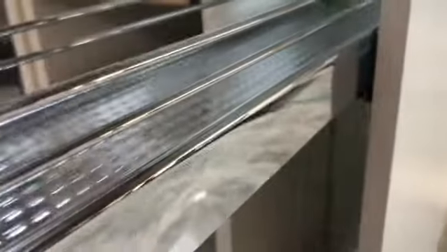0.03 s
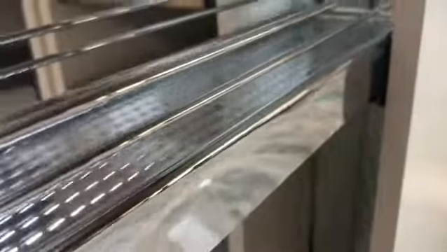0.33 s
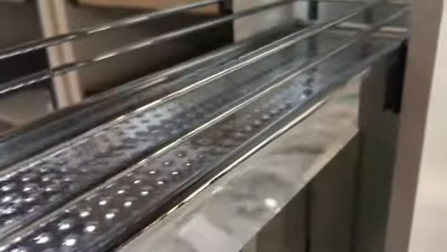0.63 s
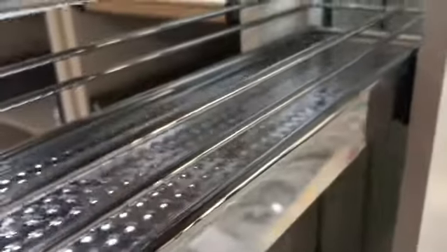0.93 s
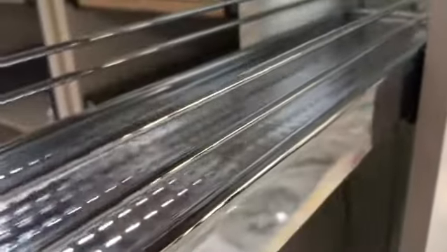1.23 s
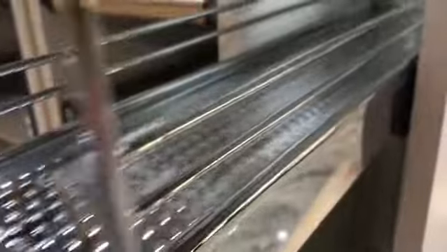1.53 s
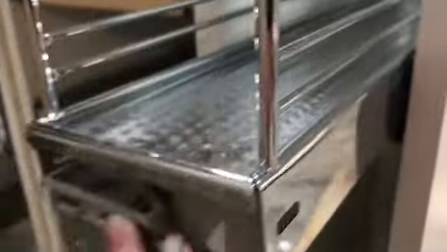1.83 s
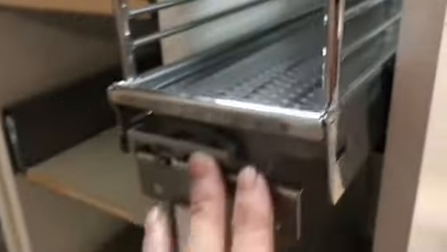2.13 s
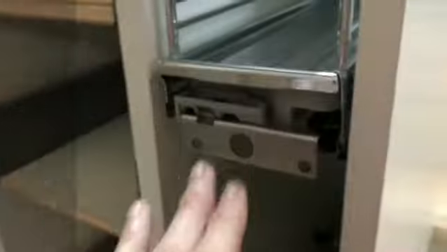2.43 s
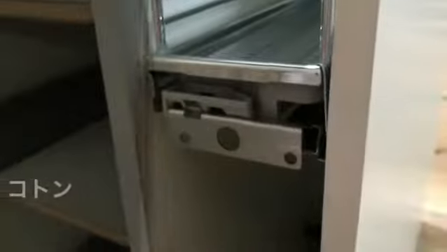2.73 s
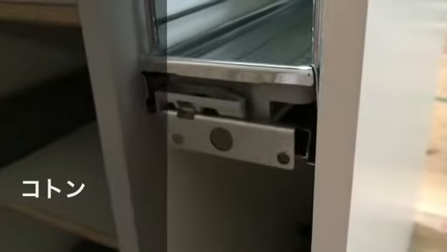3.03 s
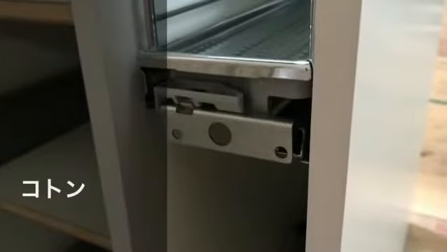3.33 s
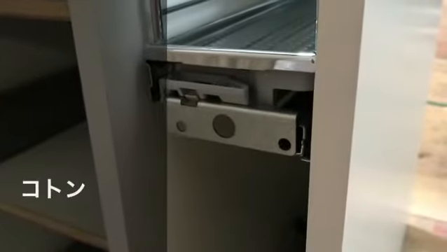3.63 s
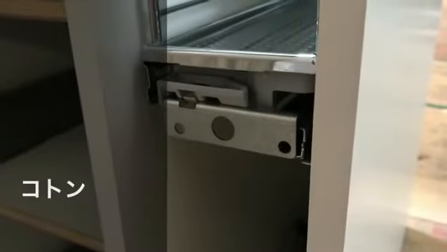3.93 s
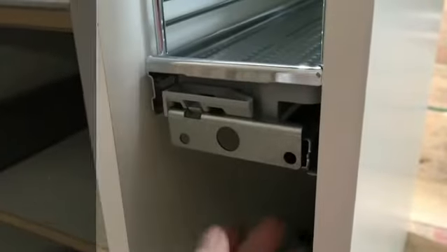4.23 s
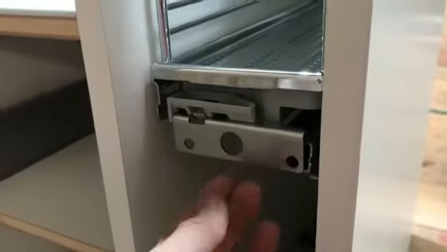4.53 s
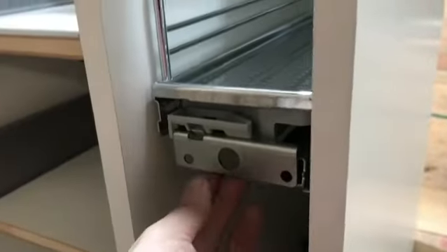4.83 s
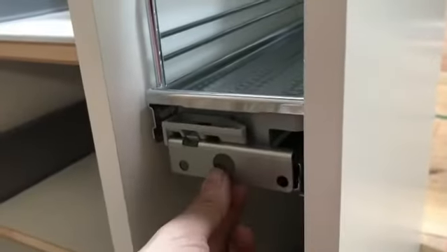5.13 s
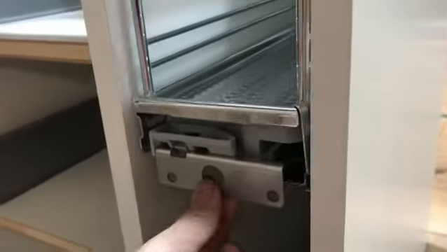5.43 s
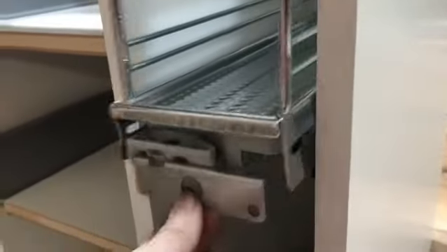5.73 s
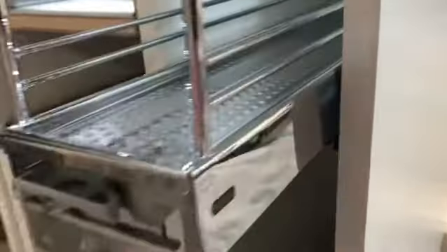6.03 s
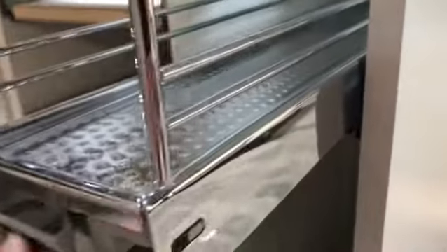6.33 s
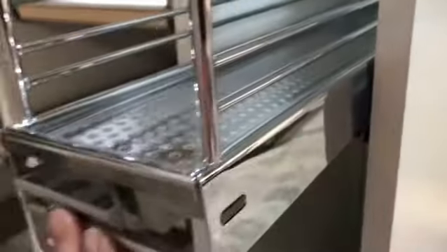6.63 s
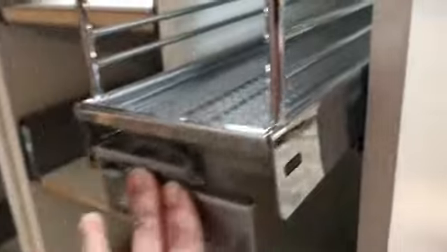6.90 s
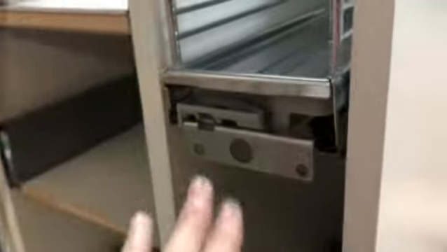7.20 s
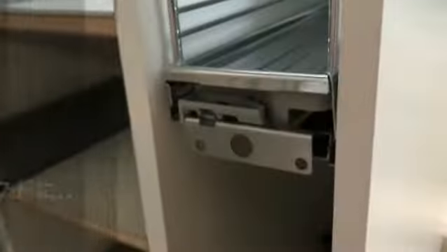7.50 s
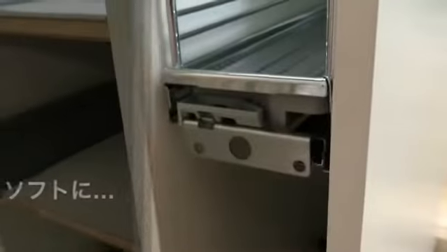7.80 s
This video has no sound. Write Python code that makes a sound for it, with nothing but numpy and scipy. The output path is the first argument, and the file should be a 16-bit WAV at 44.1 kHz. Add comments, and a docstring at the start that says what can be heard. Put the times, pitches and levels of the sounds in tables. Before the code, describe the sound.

In a quiet kitchen, a metal basket twice rolls out and back, clunking into a soft-close catch followed by a faint low hum.

```python
"""A steel pull-out basket in a kitchen cabinet, twice drawn out and pushed shut, close to one microphone.
Its ball-bearing rails rumble through the cabinet, knock as they extend and rattle at the end stop.
Each push ends in a clunk at the soft-close catch, and a damper draws the basket in with a low hum.
After the first push the catch clicks home and fingers knock the front plate.
The room is small and quiet."""
import sys
import numpy as np
from scipy import signal
from scipy.fft import rfft, irfft, next_fast_len
from scipy.io import wavfile
from scipy.ndimage import uniform_filter1d

SR = 44100
rng = np.random.default_rng(int(sys.argv[2]) if len(sys.argv) > 2 else 0)


def waveform_to_disk(signal):
    """Save audio, clipped to [-1, 1], as 16-bit WAV at the path in sys.argv[1]."""
    frames = np.transpose(np.atleast_2d(signal))
    scaled = np.clip(frames, -1, 1) * 32767
    samples = np.round(scaled).astype(np.int16)
    wavfile.write(sys.argv[1], SR, samples)


N = 355446
TIME = np.arange(N) / SR

# modes of the steel frame and of the loaded cabinet: pitch_hz, level_db, t60_s
STEEL_MODES = [(798, -9.5, 0.088), (894, -13, 0.097), (979, -18, 0.076), (1103, -11, 0.076),
               (1370, -18, 0.14), (1514, -7.5, .05), (1583, 0.5, 0.05), (1796, -6.5, 0.038),
               (1970, 0, 0.062), (2067, -6, 0.07), (2375, -2, 0.0503), (2364, 0, 0.038), (2660, -8, 0.09),
               (2780, -4, 0.059), (3180, -12, 0.043), (3240, -9, 0.054), (3404, -3, 0.05),
               (3507, -1.5, .06), (3880, -4.5, 0.038), (4115, 3.5, 0.043), (4220, -11, 0.044),
               (4840, -9, 0.041), (4730, -11, 0.018), (5100, -21.5, .035), (5600, -17, 0.058),
               (6560, -3, 0.029), (8300, -18.5, 0.044), (11400, -17, 0.032), (11300, -21.5, .035)]
CABINET_MODES = [(74.87, -11.5, 1.1), (100.2, -8, 0.37), (128.1, 0, 0.55), (140.3, -7.5, 0.43),
                 (180.7, -3.5, .55), (193.8, -4.5, 0.38), (216.8, -9, 0.21), (265, -8, 0.25),
                 (306.4, -7.5, 0.28), (345, -22.5, 0.17), (407, -7.5, .3), (430, -6, 0.21),
                 (486, -10.5, 0.91), (516, -5.5, 0.23), (623, -16.5, 0.252), (750, -11, .2)]
# the basket meets the catch and a low hum follows: start_s, metal_db, thump_db, hum_length_s
CLUNKS = [(2.3855, -25.5, -38.5, 0.68), (7.2329, -26, -41.5, 0.684)]
# spectrum of the steel in a clunk: frequency_hz, level_db
CLUNK_SPECTRUM = [(150, -13.5), (450, -11.5), (850, -7), (1250, -15), (1700, -1.5), (2500, -2),
                  (4300, -5.5), (5200, -14), (7000, -11), (9500, -20.5), (12000, -21.5), (16000, -30)]


def amp(db):
    """Decibels to gain."""
    return 10 ** (np.asarray(db) / 20)


def unit(x):
    """Scales to rms 1."""
    return x / np.sqrt(np.mean(x ** 2) + 1e-30)


def read(points, hz):
    """Reads a table on a log-frequency axis."""
    points_hz, values = np.transpose(points)
    return np.interp(np.log(hz + 1), np.log(points_hz + 1), values)


def pitches(modes):
    """The modes' frequencies in Hz."""
    return np.array(modes)[:, 0]


def add(mix, start_s, sound):
    """Mixes a sound in at start_s."""
    part = mix[max(round(start_s * SR), 0):][:len(sound)]
    part += sound[:len(part)]


def colour(x, spectrum):
    """Filters by a table of frequency_hz, level_db."""
    size = next_fast_len(len(x))
    gain = amp(read(spectrum, np.fft.rfftfreq(size, 1 / SR)))
    return irfft(rfft(x, size) * gain, size)[:len(x)]


def decay(t, t60):
    """Free decay, 60 dB down after t60 seconds."""
    return np.exp(-np.log(1000) * t / np.maximum(t60, 1e-3))


def dense_modes(db_at, t60, size):
    """Countless close modes of random phase, dying together."""
    hz = np.fft.rfftfreq(size, 1 / SR)
    fade = decay(TIME[:size], t60)
    modes = irfft(amp(db_at(hz)) * np.exp(2j * np.pi * rng.random(len(hz))), size)
    return unit(modes * fade) * np.sqrt(np.mean(fade ** 2))


def ringing(modes, size, swell_cycles=0.092):
    """One row a mode: a sine that builds up and dies, neighbours in opposite sign."""
    t = TIME[:size]
    rows = []
    for k, (hz, db, t60) in enumerate(modes):
        swell = 1 - np.exp(-t * hz / swell_cycles)
        rows.append((-1) ** k * amp(db) * decay(t, t60) * swell * np.sin(2 * np.pi * hz * t))
    return np.array(rows)


def grains(per_s, spread_db):
    """Balls strike specks on the track: random clicks of uneven size."""
    at = np.flatnonzero(rng.random(N) < per_s / SR)
    sign = np.sign(rng.random(N)[at] - .5)
    out = np.zeros(N)
    out[at] = sign * amp(spread_db * np.minimum(rng.exponential(1, N)[at], 4))
    return unit(out)


def rolling(steel, wood, rumble_db=-2, ring_db=-7, frame_db=-17.5, fade_s=0.15):
    """The bearings shake the cabinet, which rings on; the balls themselves grind and hiss."""
    # levels along each stroke: time_s, shake_db, grind_db, hiss_db
    first_pull = [(0, -50, -60, -70), (.15, -51.5, -60.5, -68), (.52, -51, -63.5, -69), (.6, -53, -56, -64),
                  (.83, -61.5, -74, -85), (.93, -54, -72, -99), (.98, -65, -84, -91)]
    first_push = [(1.02, -69, -83.5, -87), (1.12, -54, -67.5, -73.5), (1.35, -50.5, -58.5, -66.5),
                  (1.72, -48.5, -63.5, -71.5), (2.0, -50.5, -66.5, -75.5), (2.22, -45.5, -62, -73.5),
                  (2.34, -41.5, -57.5, -65)]
    second_pull = [(5.14, -58.5, -85, -86), (5.24, -61, -68.5, -69.5), (5.62, -54, -69.5, -70.5),
                   (5.74, -60.5, -71, -67.5), (5.81, -45, -56, -69), (6.04, -42, -60, -69),
                   (6.25, -57, -66, -75.5), (6.33, -56, -59.5, -71), (6.469, -64, -77, -78)]
    second_push = [(6.64, -58.5, -84, -94), (6.87, -54, -69.5, -78.5), (7.02, -46, -59, -72),
                   (7.13, -44, -60, -72), (7.19, -52.5, -56.5, -64)]
    # spectra of the cabinet's rumble, the balls and the track: frequency_hz, level_db
    rumble_spectrum = [(25, -34.5), (45, -19), (60, -6), (72, 3.5), (90, -0.5), (110, -2.5), (130, 6),
                       (160, -7), (190, -3), (225, -4.5), (300, -13), (450, -23), (900, -59)]
    ball_spectrum = [(150, -20), (300, -1.5), (450, 3), (600, -3), (850, -4), (1200, -12.5), (1700, -15),
                     (3000, -36.5)]
    track_spectrum = [(760, -30.5), (1300, -4), (1840, -2.5), (2770, 1), (3110, -4.5), (4040, -4),
                      (4990, -10), (5960, -5.5), (7590, -14), (8980, -10.5), (10500, -16.5), (14400, -14),
                      (16000, -13.5)]
    shake, grind, hiss = np.zeros((3, N))
    for stroke in (first_pull, first_push, second_pull, second_push):
        times, *levels_db = np.transpose(stroke)
        outside_s = np.abs(TIME - np.clip(TIME, times[0], times[-1]))
        for envelope, db in zip((shake, grind, hiss), levels_db):
            envelope += amp(np.interp(TIME, times, db)) * np.exp(-outside_s / fade_s)
    rumble = unit(colour(grains(per_s=1500, spread_db=1.5), rumble_spectrum))
    response = amp(read(rumble_spectrum, pitches(CABINET_MODES)) / 2) @ wood
    jolts = shake * grains(per_s=1500, spread_db=1.5)
    ring = signal.oaconvolve(jolts, response / np.linalg.norm(response))[:N]
    balls = unit(colour(grains(per_s=3000, spread_db=2.2), ball_spectrum))
    specks = grains(per_s=9000, spread_db=1.5)
    frame = amp(frame_db) * unit(signal.oaconvolve(specks, steel.sum(0))[:N])
    track = unit(colour(specks + frame, track_spectrum))
    return amp(rumble_db) * shake * rumble + amp(ring_db) * ring + grind * balls + hiss * track


def rubbing(drone_from_hz=141, drone_to_hz=129.25, drone_width_hz=35):
    """Friction noise in gliding resonances that swell and fade."""
    # the rails drone in mid-stroke: start_s, peak_s, end_s, level_db
    drones = [(.3, .492, 0.95, -54.5), (1.1, 1.65, 1.97, -50.5), (5.3, 5.57, 5.78, -50.5)]
    # slides and damper whirr faintly: start_s, peak_s, end_s, level_db, from_hz, to_hz, width_hz
    rubs = [(.648, .78, 1.23, -72, 1724, 1394, 640), (3, 3.386, 4.4, -76, 697, 1601, 3600),
            (3.715, 3.775, 4.0, -62, 2106, 1398, 3730), (5.151, 5.374, 5.8, -70.5, 3360, 3170, 2000),
            (6.381, 6.465, 6.52, -69, 7970, 12500, 9150), (7.353, 7.455, 8.3, -74.5, 1211, 1016, 380)]
    glides = [(*row, drone_from_hz, drone_to_hz, drone_width_hz) for row in drones] + rubs
    out = np.zeros(N)
    for start, peak, end, db, from_hz, to_hz, width_hz in glides:
        t = np.arange(start, end, 1 / SR)[:SR]
        pole = np.exp(-np.pi * width_hz / SR)
        noise = rng.standard_normal(SR) + 1j * rng.standard_normal(SR)
        narrow = signal.lfilter([1], [1, -2 * pole, pole * pole], noise)[:len(t)]
        carrier = np.exp(2j * np.pi * np.cumsum(np.linspace(from_hz, to_hz, len(t))) / SR)
        swell = np.interp(t, [start, peak, end], [0, 1, 0])
        add(out, start, amp(db) * swell * unit((narrow * carrier).real))
    return out


def band(centre_hz, octaves):
    """The band that a contact excites, as dB against frequency."""
    return lambda hz: -4.5 * (np.log2((hz + 1) / centre_hz) / octaves) ** 2


def thump(wood, cut_hz, t60, rise_s, ring_db):
    """A blow spreads into the cabinet; a soft blow reaches only its low modes."""
    # the wood panels' dense modes: frequency_hz, level_db
    panels = [(20, -47.5), (35, -30), (65, -4), (130, -1.5), (250, 0.5), (350, -8), (520, -6), (900, -10.5),
              (2000, -14), (5000, -62)]
    softness_db = lambda hz: -10 * np.log10(1 + (hz / cut_hz) ** 4)
    out = amp(ring_db) * (amp(softness_db(pitches(CABINET_MODES))) @ wood)
    add(out, 0, dense_modes(lambda hz: read(panels, hz) + softness_db(hz), t60, size=16384))
    return out * (1 - np.exp(-TIME[:len(out)] / rise_s))


def clink(steel, reach, t60, ring_db=-14, rise_s=0.0006):
    """A steel contact: a dense crack, and the frame's modes as far as the contact reaches them."""
    ring = amp(ring_db) * (amp(reach(pitches(STEEL_MODES))) @ steel)
    crack = dense_modes(reach, t60, size=len(ring))
    return (crack + ring) * (1 - np.exp(-TIME[:len(ring)] / rise_s))


def knock(steel, wood, metal_db, reach, t60, thump_db, cut_hz):
    """A small contact excites its own band of the steel and shakes the cabinet."""
    out = amp(thump_db) * thump(wood, cut_hz, t60=0.18, rise_s=0.003, ring_db=-6.5)
    add(out, 0, amp(metal_db) * clink(steel, reach, t60))
    return out


def loose(modes, depth=0.43, size=16384):
    """A loose part touches its neighbours, so each of its modes flutters."""
    rows = ringing(modes, size)
    for mode in rows:
        mode *= 1 + depth * unit(uniform_filter1d(rng.standard_normal(size), size=128))
    return rows


def rail_knocks(steel, wood):
    """The rails' stages knock on the way out; at the end stop the basket's wires jingle too."""
    # the stages knock: start_s, metal_db, centre_hz, width_octaves, t60_s, thump_db
    bumps = [(.4884, -58.5, 5950, 1.2, .08, -75), (.906, -59, 1170, 0.66, 0.056, -57),
             (5.703, -51, 3070, 0.35, 0.059, -65), (5.761, -56.5, 2200, 1.4, 0.15, -47.5),
             (5.779, -58, 850, 1.1, .11, -41.5), (5.8171, -51.5, 2500, 1.8, 0.069, -43),
             (5.833, -56, 1500, 0.9, .03, -45), (6.1011, -52, 1550, 0.67, 0.078, -48.5),
             (6.124, -55, 1780, 0.66, 0.15, -46.5)]
    # end-stop rattle: start_s, metal_db, centre_hz, width_octaves, t60_s, thump_db, wires_db
    stops = [(.548, -53, 1170, .85, 0.072, -60, -80), (0.5576, -48, 7000, 1.2, 0.021, -70, -72),
             (.578, -53.5, 1400, .82, .12, -52, -72), (0.6068, -56, 2000, 1.5, 0.21, -63, -68),
             (.69, -62, 1000, 0.96, .1, -59, -78), (6.2515, -52, 2202, 1.1, .039, -60, -61),
             (6.265, -52, 1540, 0.57, 0.15, -53.5, -53.5), (6.3244, -45, 1960, 1.18, 0.024, -57, -64),
             (6.373, -64, 2000, 1, 0.037, -59.5, -82)]
    # the loose wires' modes: pitch_hz, level_db, t60_s
    wire_modes = [(2810, -2, .1), (2950, -3, .09), (5450, -6, .12), (8500, -13, .16), (11800, -11, .14),
                  (12050, -10, .16), (15300, -14, .12)]
    out = np.zeros(N)
    for start, metal_db, hz, octaves, t60, thump_db in bumps:
        add(out, start, knock(steel, wood, metal_db, band(hz, octaves), t60, thump_db, cut_hz=620))
    for start, metal_db, hz, octaves, t60, thump_db, wires_db in stops:
        add(out, start, knock(steel, wood, metal_db, band(hz, octaves), t60, thump_db, cut_hz=700))
        add(out, start, amp(wires_db) * loose(wire_modes).sum(0))
    return out


def catch(steel, wood, pick_up_t60_s=0.06):
    """The basket trips the trigger and picks up the catch; later the catch snaps home. A faint high tick, heard
    as the first low hum breaks off, is also placed here."""
    # the basket passes the trigger, in or out: start_s, level_db
    trips = [(2.352, -49), (5.797, -56), (5.833, -56), (7.195, -53)]
    # contacts just before each clunk: lead_s, metal_db, centre_hz, width_octaves, thump_db, cut_hz
    pick_ups = [(.052, -53.5, 7900, .7, -49.5, 250), (0.044, -50.5, 990, .32, -49, 900),
                (.0175, -53.5, 7000, .9, -56, 250)]
    # a faint high tick as the first low hum breaks off; later the catch snaps home: start_s, metal_db,
    # centre_hz, width_octaves, t60_s, thump_db, cut_hz
    clicks = [(3.04, -69, 13000, .4, .05, -78, 300), (3.577, -40, 9500, 1.3, 0.042, -56, 300),
              (3.578, -43, 1460, 0.82, .058, -52.5, 1200), (3.594, -40.5, 3100, 0.69, .06, -45.5, 900),
              (3.602, -45.5, 1400, 1.26, 0.056, -43, 300), (3.661, -50.5, 4200, .58, .16, -48.5, 302)]
    # modes of the trigger and of the catch: pitch_hz, level_db, t60_s
    trigger_modes = [(3720, -0.5, .032), (3990, -7.5, .025)]
    catch_modes = [(1683, 2.5, 0.042), (1950, 0, 0.032), (2850, -6, 0.1), (3330, -6, 0.069),
                   (7250, -8, .06), (8540, -2.5, 0.054), (11900, -4, .037), (15000, -8, 0.036)]
    out = np.zeros(N)
    for start, db in trips:
        add(out, start, amp(db) * loose(trigger_modes).sum(0))
    for clunk_s, *_ in CLUNKS:
        for lead_s, metal_db, hz, octaves, thump_db, cut_hz in pick_ups:
            contact = knock(steel, wood, metal_db, band(hz, octaves), pick_up_t60_s, thump_db, cut_hz)
            add(out, clunk_s - lead_s, contact)
    for start, metal_db, hz, octaves, t60, thump_db, cut_hz in clicks:
        reach = band(hz, octaves)
        add(out, start, knock(steel, wood, metal_db, reach, t60, thump_db, cut_hz))
        add(out, start, amp(metal_db + reach(pitches(catch_modes))) @ loose(catch_modes))
    return out


def crash(steel, ring_delay_s=0.004, ring_db=-2, build_s=0.0042):
    """A quick run of steel contacts pumps up the frame's modes over a few milliseconds."""
    # the contacts within one clunk: delay_s, level_db, treble_tilt_db_per_octave
    contacts = [(0, -7.5, -1.5), (.002, -7.5, 2.5), (.0045, 1, -4), (.008, -5, 6.5), (0.011, -3.5, 2)]
    out = np.zeros(SR // 2)
    for delay_s, db, tilt in contacts:
        spectrum = lambda hz: read(CLUNK_SPECTRUM, hz) + tilt * np.log2(np.maximum(hz, 2500) / 2500)
        add(out, delay_s, amp(db) * dense_modes(spectrum, t60=0.035, size=4096))
    build = 1 - np.exp(-TIME[:steel.shape[1]] / build_s)
    add(out, ring_delay_s, amp(ring_db) * steel.sum(0) * build)
    return out


def clunks(steel, wood, shudder_s=0.05, shudder_db=-4, clatter_s=0.02, clatter_db=-18):
    """The basket crashes into the catch and the cabinet thumps; the loose wires clatter, and the cabinet
    shudders in a second thump."""
    out = np.zeros(N)
    wires = lambda hz: read(CLUNK_SPECTRUM, hz) - 3 * np.log2(np.maximum(hz, 3000) / 3000)
    for start, metal_db, thump_db, _ in CLUNKS:
        add(out, start, amp(metal_db) * crash(steel))
        clatter = dense_modes(wires, t60=0.22, size=16384)
        add(out, start + clatter_s, amp(metal_db + clatter_db) * clatter)
        add(out, start, amp(thump_db) * thump(wood, cut_hz=700, t60=0.44, rise_s=0.0026, ring_db=-7.5))
        shudder = thump(wood, cut_hz=510, t60=0.3, rise_s=0.006, ring_db=1.5)
        add(out, start + shudder_s, amp(thump_db + shudder_db) * shudder)
    return out


def damper_creep(glide_db=-50, glide_t60_s=0.76, creep_db=-61, rise_s=0.14, stop_s=0.03):
    """The damper brakes the basket to a creep; such slow rolling feeds only low, sharp resonances."""
    # the cabinet's low resonances: pitch_hz, width_hz, level_db
    resonances = [(74.7, 8, 0), (127, 3.78, 0), (225, 14, -10)]
    hum, level = np.zeros((2, N))
    for hz, width_hz, db in resonances:
        # a wandering phase widens the line
        drift = np.cumsum(rng.standard_normal(N)) * np.sqrt(2 * np.pi * width_hz / SR)
        hum += amp(db) * np.sin(2 * np.pi * hz * TIME + uniform_filter1d(drift, size=1024))
    for start, _, _, hum_length_s in CLUNKS:
        t = TIME[TIME < hum_length_s]
        braking = amp(creep_db) + amp(glide_db) * decay(np.maximum(t - rise_s, 0), glide_t60_s)
        fades = np.minimum(t / rise_s, 1) ** 2 * np.minimum((hum_length_s - t) / stop_s, 1)
        add(level, start, braking * fades)
    return level * unit(hum)


def finger_taps(steel, wood, t60_s=0.061):
    """Soft knocks ring those modes of the front plate that lie near each knock's centre frequency."""
    # fingers meet the plate: start_s, metal_db, centre_hz, thump_db, plate_db
    taps = [(4.2644, -62.5, 1350, -65, -61), (4.4362, -52, 2540, -51, -62), (4.443, -55, 850, -48, -49.5),
            (5.0485, -51, 1710, -45, -45.5), (5.051, -58, 480, -51, -46), (5.075, -57, 1310, -48.5, -63),
            (5.367, -63, 1000, -50.5, -57)]
    # the front plate's modes: pitch_hz, level_db, t60_s
    plate_modes = [(447.5, -2, 0.45), (501, -7, 0.43), (876, 0.5, 0.086), (1560, -8.5, .055),
                   (1870, -3, 0.051), (2210, -10, .05)]
    out = np.zeros(N)
    for start, metal_db, hz, thump_db, plate_db in taps:
        reach = band(hz, octaves=0.89)
        add(out, start, knock(steel, wood, metal_db, reach, t60_s, thump_db, cut_hz=480))
        modes_db = plate_db + band(hz, octaves=0.42)(pitches(plate_modes))
        add(out, start, amp(modes_db) @ loose(plate_modes))
    return out


def kitchen(basket, tail_db=-18, rise_s=0.005, tone_db=-64):
    """The close sound, the small room's tail with its treble dying first, and faint room tone."""
    # the room's decay: frequency_hz, t60_s
    decay_times = [(100, 0.63), (500, 0.76), (2000, 0.52), (4000, 0.48), (8000, 0.27), (16000, 0.4)]
    # the room tone: frequency_hz, level_db
    tone_spectrum = [(22, -18.5), (45, -4.5), (75, 1.5), (120, -11), (270, -13.5), (350, -19), (470, -20.5),
                     (1000, -27.5), (2000, -34), (3800, -35), (5300, -38.5), (10500, -42.5), (12500, -37),
                     (16000, -45)]
    room_tone = unit(colour(rng.standard_normal(N), tone_spectrum))
    hz, t, noise = signal.stft(rng.standard_normal(SR // 2), SR, nperseg=256)
    _, tail = signal.istft(noise * decay(t, read(decay_times, hz)[:, None]), SR, nperseg=256)
    tail *= 1 - np.exp(-(TIME[:len(tail)] / rise_s) ** 2)
    reverb = signal.oaconvolve(basket, tail / np.linalg.norm(tail))[:N]
    return basket + amp(tail_db) * reverb + amp(tone_db) * room_tone


def scene():
    """Blows, rolling and rubbing of one steel basket in one wooden cabinet, in mono."""
    steel = ringing(STEEL_MODES, size=8192)
    wood = ringing(CABINET_MODES, size=SR, swell_cycles=0.72)
    blows = clunks(steel, wood) + catch(steel, wood) + finger_taps(steel, wood) + rail_knocks(steel, wood)
    basket = blows + rolling(steel, wood) + damper_creep() + rubbing()
    return kitchen(basket)[None]


def record(dry, edge_hz=16050):
    """The recorder's band limit."""
    lowpass = signal.firwin(511, edge_hz, window=("kaiser", 9), fs=SR)
    return signal.oaconvolve(dry, lowpass[None], "same")


dry = scene()
out = record(dry)
waveform_to_disk(out)
```